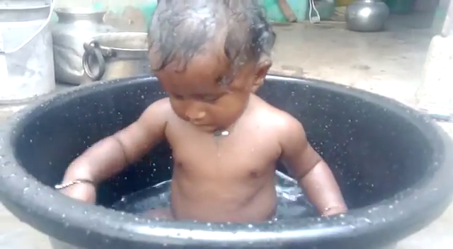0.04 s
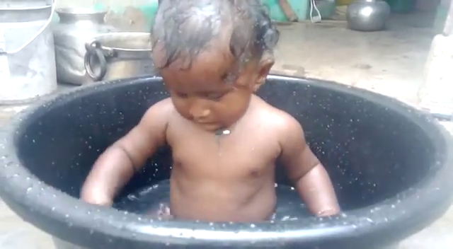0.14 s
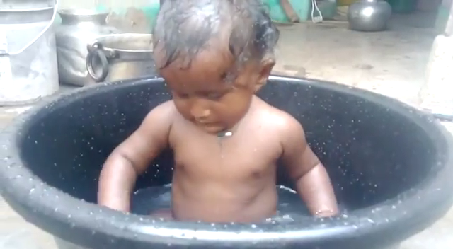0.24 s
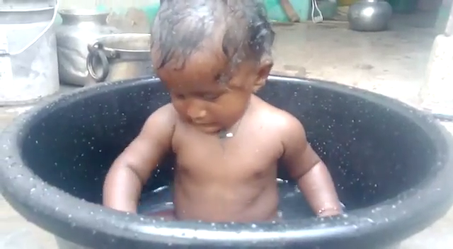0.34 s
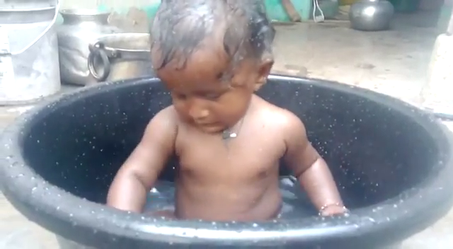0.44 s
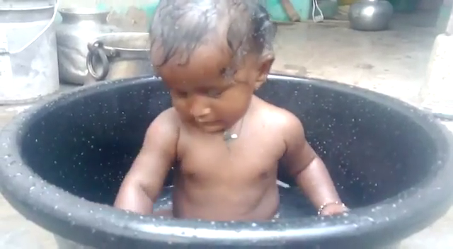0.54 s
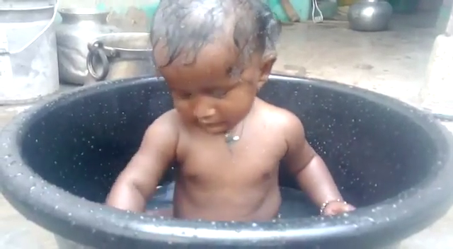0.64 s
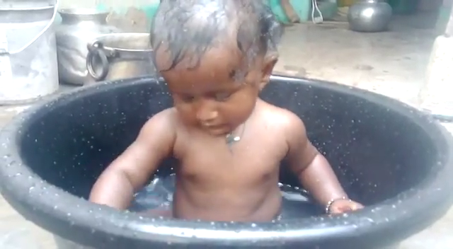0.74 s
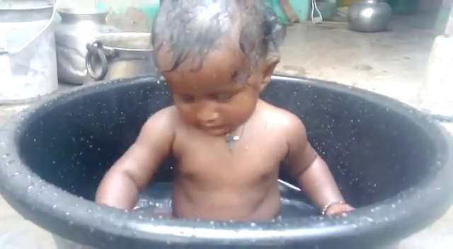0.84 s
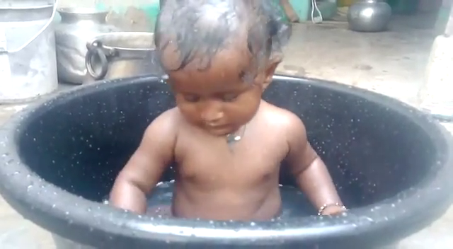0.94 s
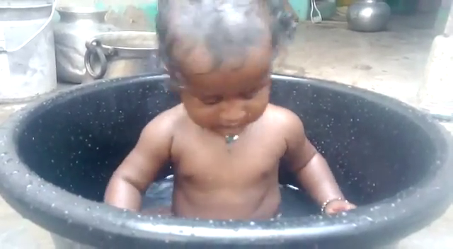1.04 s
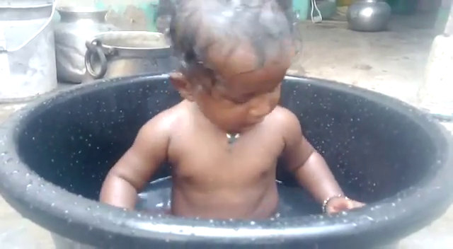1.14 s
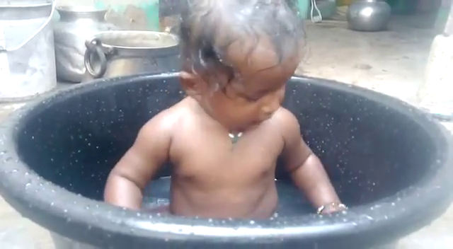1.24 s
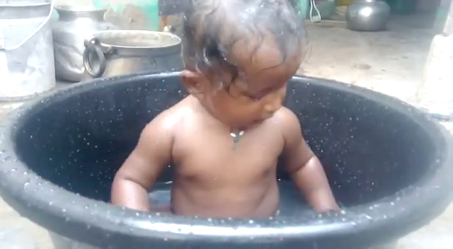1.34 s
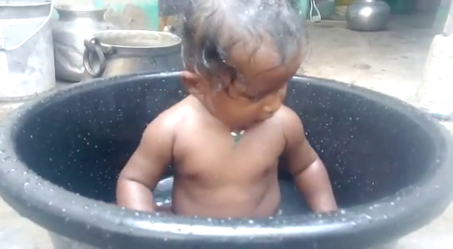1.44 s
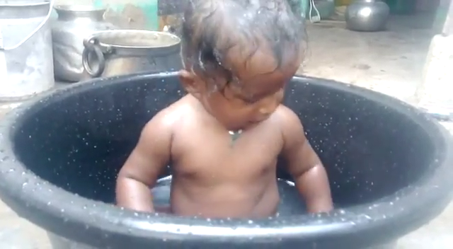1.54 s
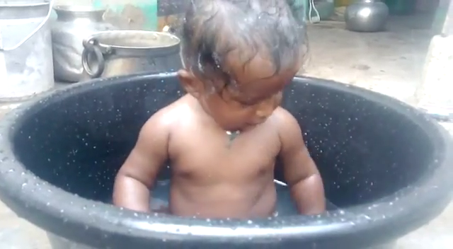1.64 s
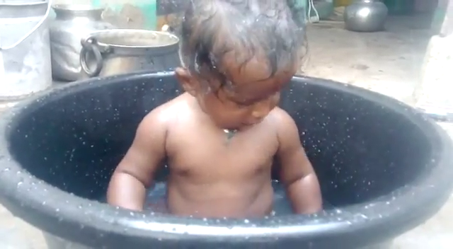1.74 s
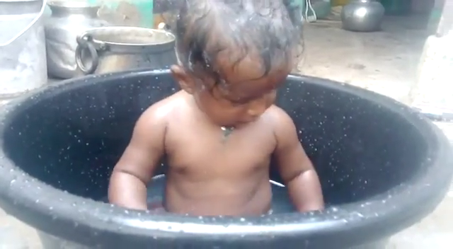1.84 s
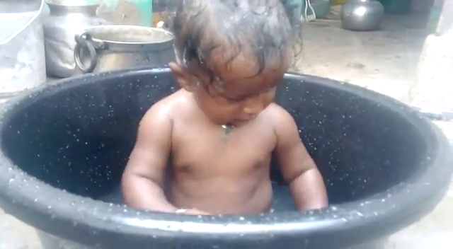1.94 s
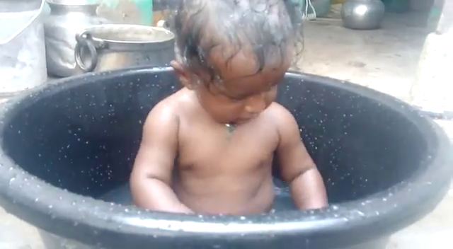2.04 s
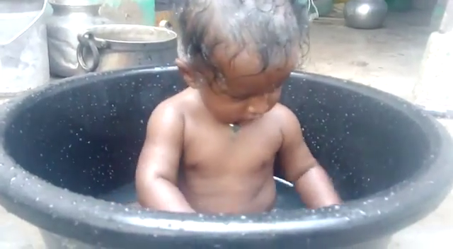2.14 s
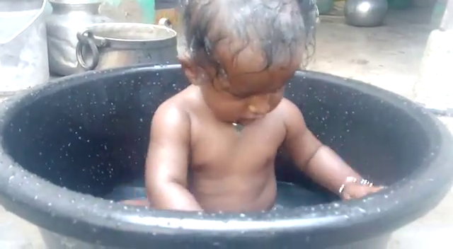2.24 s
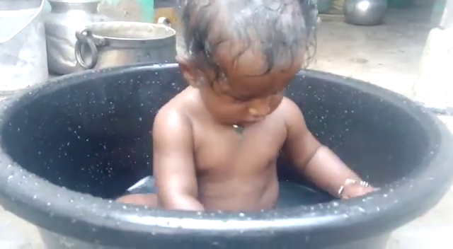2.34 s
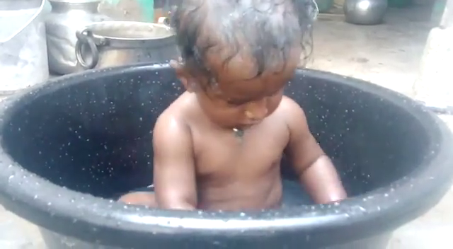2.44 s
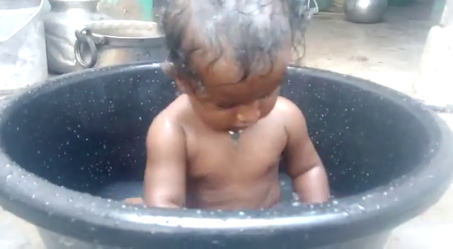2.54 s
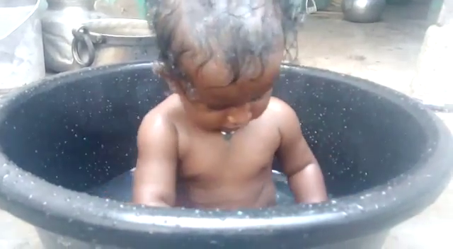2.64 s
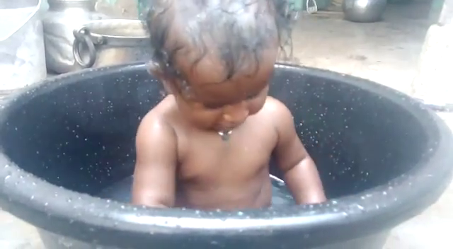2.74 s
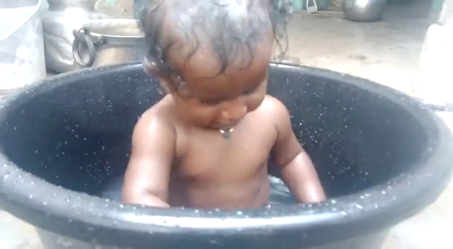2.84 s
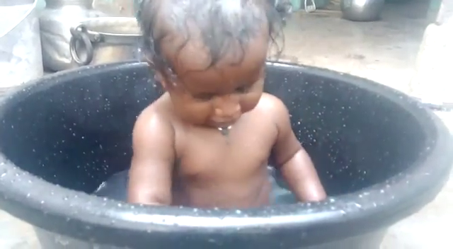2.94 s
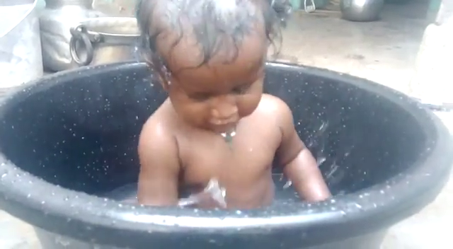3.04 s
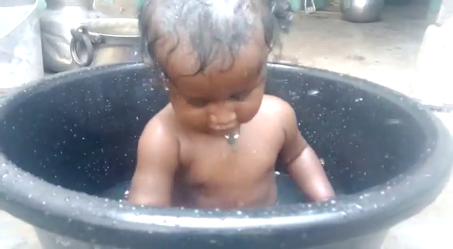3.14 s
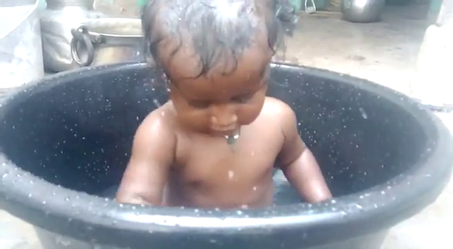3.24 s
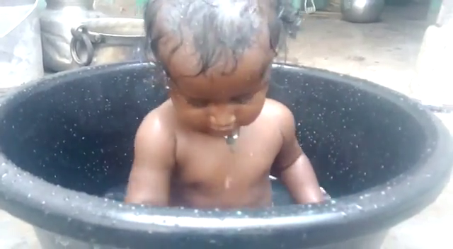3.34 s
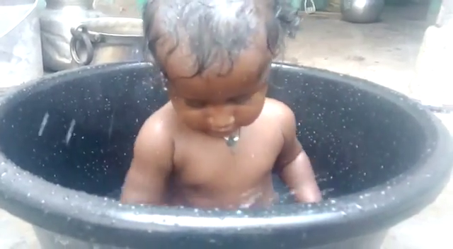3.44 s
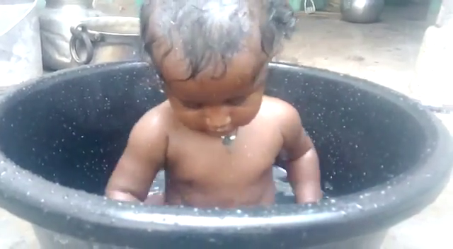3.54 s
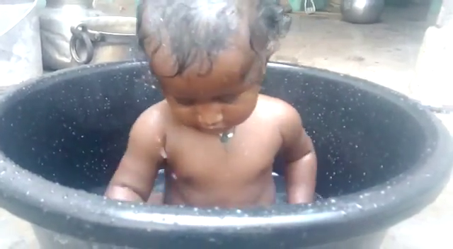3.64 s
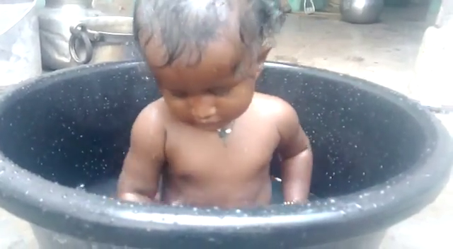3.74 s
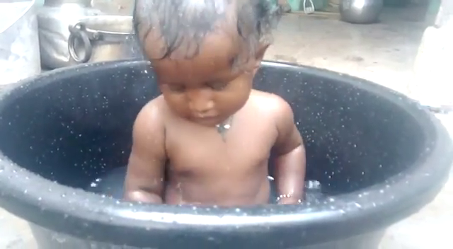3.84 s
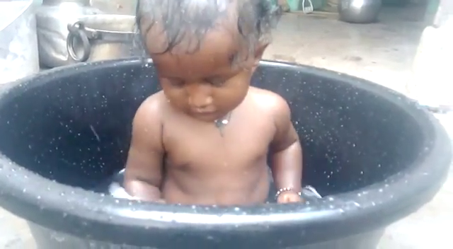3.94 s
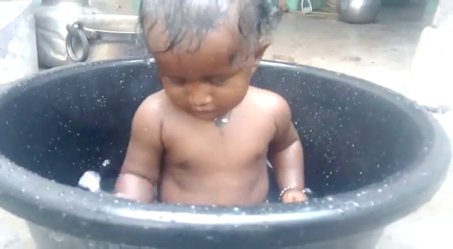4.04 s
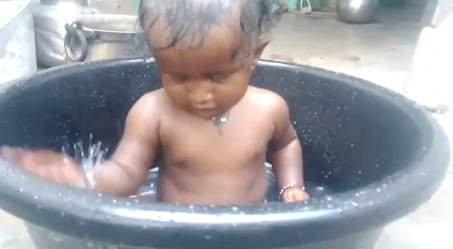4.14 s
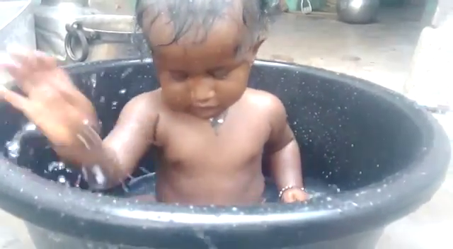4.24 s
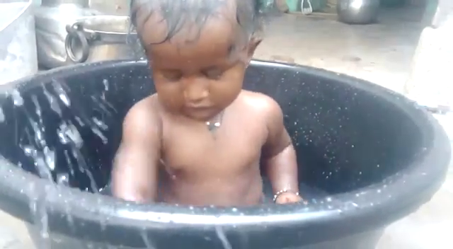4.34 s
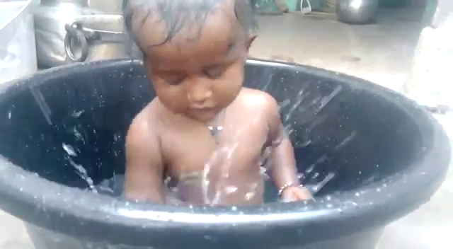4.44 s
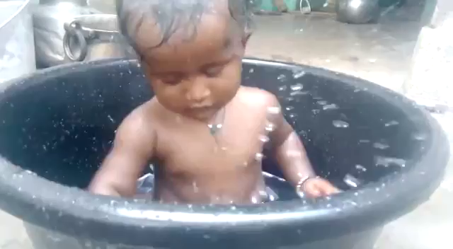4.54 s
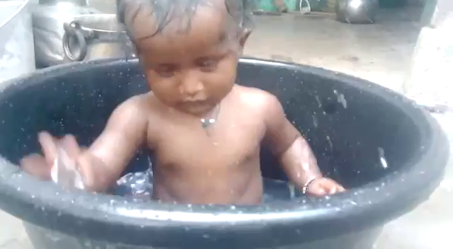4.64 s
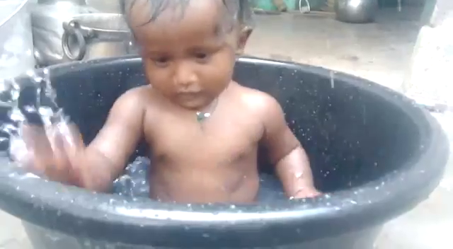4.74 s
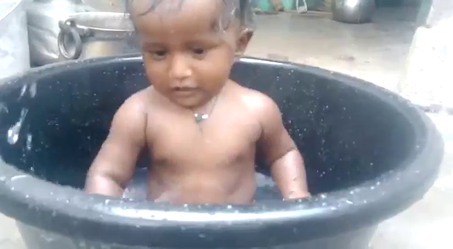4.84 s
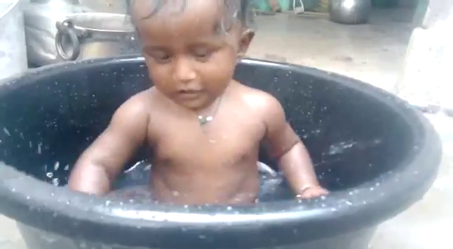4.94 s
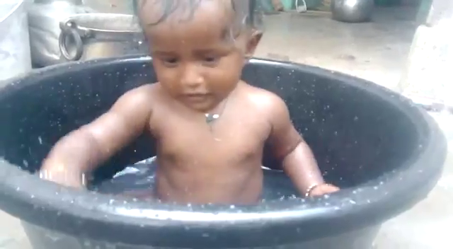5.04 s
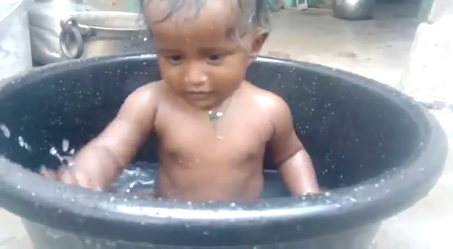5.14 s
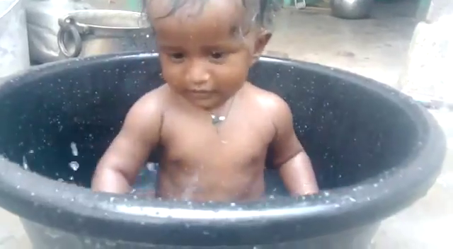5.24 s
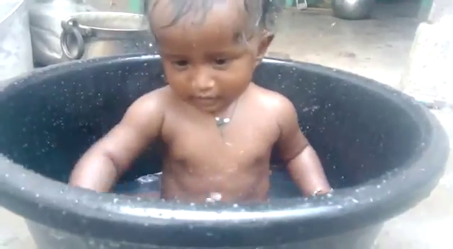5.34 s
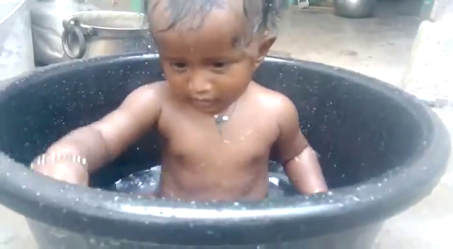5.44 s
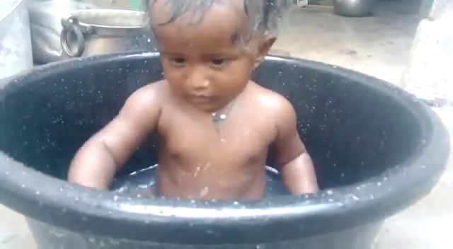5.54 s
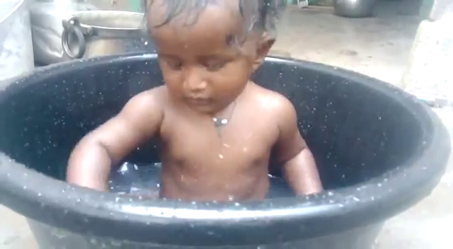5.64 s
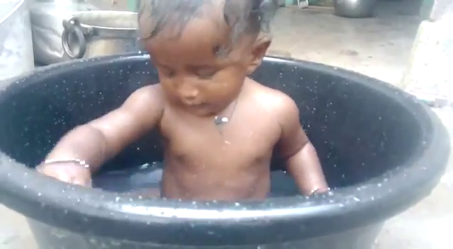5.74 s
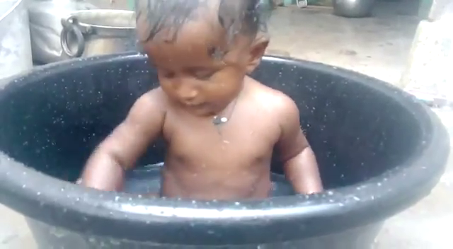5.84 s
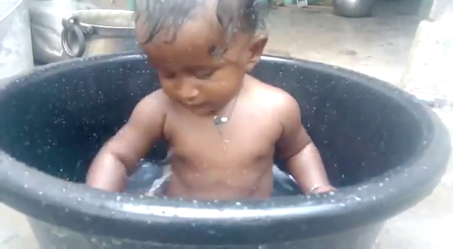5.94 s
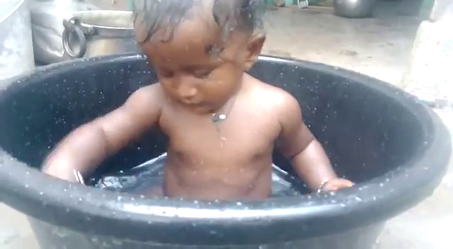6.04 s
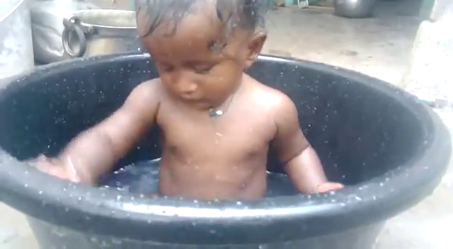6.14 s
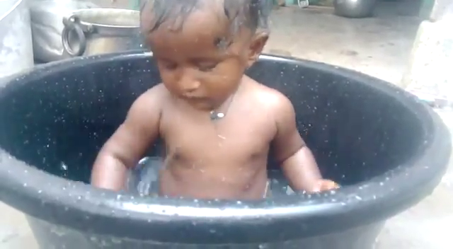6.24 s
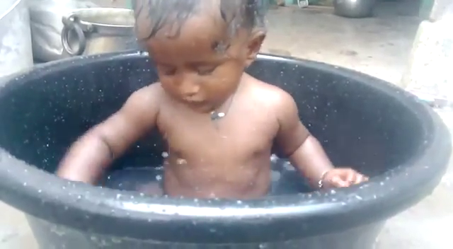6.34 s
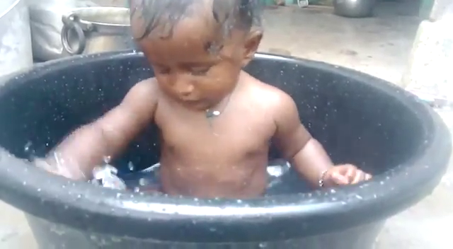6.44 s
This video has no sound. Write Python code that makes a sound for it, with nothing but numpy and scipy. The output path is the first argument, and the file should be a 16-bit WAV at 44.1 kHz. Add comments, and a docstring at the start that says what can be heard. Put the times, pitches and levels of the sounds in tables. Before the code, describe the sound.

A small hand pats and stirs shallow water in a plastic tub outdoors, light at first, then lively sharp slaps, plops and gurgling splashes.

```python
"""A wet slap cracks first; then a small hand slaps, pats and stirs shallow water in a plastic tub outdoors.
Slaps are shaped noise for spray, mist and a collapsing air pocket, plus a snap; deep plunges thump the tub.
Bubbles plop as fading tones that climb in pitch; stirred water fizzes, gurgles and sloshes in uneven grains.
Tub and paved-yard walls echo the water. Beneath lie a faint steady double tick, far rumble and air noise."""
import sys
import numpy as np
from scipy import signal
from scipy.fft import rfft, irfft
from scipy.io import wavfile
from scipy.ndimage import uniform_filter1d

SR = 44100
rng = np.random.default_rng(int(sys.argv[2]) if len(sys.argv) > 2 else 0)


def wav_out(sig):
    """Save sig, one row per channel (or a flat mono array), as 16-bit PCM at SR to the path in sys.argv[1]."""
    wavfile.write(sys.argv[1], SR, np.round(np.clip(np.atleast_2d(sig).T, -1, 1) * 32767).astype(np.int16))


N = 286209  # length in samples

# Fade times (t60) are the seconds a sound takes to drop by 60 dB.
# Slaps and drop hits; mist, pocket and snap levels are relative to the spray, and the fade time is
# limited, then shortened for mist and pocket:
# start_s, spray_db, spray_hz, mist_db, pocket_hz, pocket_db, fade_s, snap_db
SLAPS = [(0.0578, -28, 4250, -19, 2700, -7, 0.18, -7), (.0656, -27, 4380, -18, 2520, -28, 0.05, 15),
         (0.186, -41.5, 3870, -39, 2230, -27, .052, 5), (0.2072, -48.5, 4900, -34, 2117, -7, 0.082, 10),
         (0.266, -50, 4910, -41, 1190, -16, .18, 16.5), (0.313, -61, 4500, -37, 1160, -11, 0.19, 18),
         (0.409, -59, 5470, -7, 2560, -10, 0.2, 17.5), (0.7061, -38.5, 4260, -12.5, 2760, -24, 0.087, -12),
         (0.7111, -42, 4200, -51, 3050, -6.5, 0.18, 15.5), (.945, -56.5, 4570, -40, 1600, -1, 0.099, 0),
         (0.9734, -53, 4300, -38, 2340, 0, 0.051, 16), (0.9907, -52.5, 4490, -44, 2640, -9, 0.19, 9),
         (1.0228, -49.5, 4320, -50, 2570, -31, 0.12, 21.5),
         (1.1211, -33.5, 4730, -5.5, 2580, -38, 0.025, -7),
         (1.1279, -33.5, 5200, -16, 2600, -48, 0.16, -12), (1.133, -38, 4950, -33, 2640, -42, 0.024, 22.5),
         (1.495, -56, 4100, -9, 2610, -35, .088, -12), (1.508, -40, 4270, -21, 2450, -55, 0.079, 5),
         (2.5323, -32.5, 4050, -24, 2630, -13.5, 0.03, -15), (2.5451, -44.5, 4020, -30, 2740, -27, .21, -5),
         (2.648, -50.5, 5480, -20, 2290, -27, 0.23, 15), (2.6744, -34, 3940, -17.5, 1630, -6.5, 0.12, -5),
         (2.7782, -42, 4100, -47, 2520, 1, 0.069, 1), (2.8085, -43.5, 4200, -36, 877, -30, 0.072, -5),
         (2.8834, -47, 4600, -3, 2590, -8, 0.26, -4.5), (2.8935, -32.5, 4700, -29, 904, -7.5, 0.039, 7.5),
         (3.089, -47.5, 5240, -38, 960, 2.5, 0.023, 10), (3.1641, -34.5, 4200, -14, 775, -8, 0.36, -5.5),
         (3.1744, -23.5, 5700, -15, 980, 0, 0.081, -10), (3.2831, -39, 4000, -26, 2300, 7, 0.62, -14),
         (3.3147, -26.5, 3660, -25, 850, 6, .036, 10.5), (3.3278, -31, 3640, -29, 843, -11, 0.12, -0.5),
         (3.4015, -59, 4080, -21, 1490, 20, 0.09, 9), (3.442, -40.5, 4300, -25, 2330, 7, 0.41, -9),
         (3.4535, -35.5, 3630, -26, 880, 2, 0.2, 0.5), (3.5772, -33, 4220, -15, 2570, 6, 0.085, -5),
         (3.5847, -27, 4070, -17, 2190, -12, 0.048, 11.5), (3.5995, -34, 3520, -40, 2180, -36, 0.16, 13),
         (3.7141, -38, 3660, -17.5, 1610, -2.5, 0.13, -1.5), (3.7856, -57, 3860, -7, 1090, 11, 0.1, 7),
         (3.8636, -43.5, 4080, -15, 912, 2, 0.19, 1), (3.902, -42.5, 6730, -8, 1130, 13, 0.11, 9),
         (3.9201, -28.5, 3990, -27, 1650, -0.5, 0.19, -5.5), (3.9845, -34, 3760, -35, 1490, 10, 0.12, 0),
         (4.02, -36.5, 4430, -28, 750, 0.5, 0.35, 0), (4.0434, -28.5, 3900, -22, 1520, -13, 0.19, -13),
         (4.0637, -28.5, 3830, -24, 2390, -2, 0.068, -6.5), (4.1345, -45.5, 4560, -21, 1800, -8, 0.24, 5),
         (4.2514, -55, 3900, -33, 2190, 10.5, .087, 10), (4.3121, -38, 3900, -16.5, 1320, 4, 0.14, -4.5),
         (4.3256, -38, 5500, -33, 1420, -17, 0.18, -9), (4.3726, -37, 4830, -25, 1470, 4.5, 0.058, -9),
         (4.3996, -40.5, 5400, -15.5, 1200, -3, 0.076, -7),
         (4.5662, -18, 3690, -20.5, 2800, -5.5, 0.057, -5), (4.5776, -29, 6100, -17, 2270, -27, 0.13, -7),
         (4.6192, -37, 4000, -24, 950, 1.5, 0.21, -0.5), (4.6888, -39.5, 4730, -10, 1580, 8.5, 0.049, 0),
         (4.7494, -46, 4210, -10, 1370, 9.5, 0.28, -9), (4.781, -35.5, 4430, -37, 2400, -0.5, 0.16, 10),
         (4.8533, -29, 4480, -23, 870, -5.5, 0.04, 4), (4.8918, -36, 4200, -34, 930, 2, .088, -2.5),
         (4.9093, -36.5, 3500, -23, 2400, 4, .064, -10), (4.9898, -47, 5040, 2, 1890, 7, 0.1, 12),
         (5.0258, -15.5, 4760, -26, 2610, -14, 0.11, 6), (5.2308, -29, 6410, -10, 1580, -34, 0.029, 2.5),
         (5.2924, -36.5, 5230, -28, 1200, -1.5, 0.036, 3.5), (5.3187, -36, 3420, -35, 2700, 0, 0.044, 2.5),
         (5.3797, -56, 3540, -21, 2240, -6, .076, 18), (5.4164, -22, 4450, -22, 2470, -26, 0.084, -12),
         (5.4235, -29, 4710, -18, 2320, -1.5, 0.15, 17.5), (5.4848, -36, 4400, -26, 1690, 3, 0.24, -9.5),
         (5.6114, -39.5, 4020, -33, 2450, -4, .054, -4), (5.6464, -38.5, 4130, -35, 2320, -18, .16, 1),
         (5.6762, -39, 4640, -29, 2330, 0.5, 0.16, 19), (5.8102, -45.5, 4300, -23, 2160, -34, 0.33, -16),
         (5.8484, -37.5, 3170, -30, 1710, -3.5, 0.22, -2),
         (6.0566, -29, 4760, -14.5, 1770, -19, 0.057, -10.5),
         (6.0672, -30, 5700, -20, 1730, -10.5, 0.12, -8.5), (6.0828, -42, 5570, -15, 1780, -4.5, 0.051, 3),
         (6.1668, -30, 4440, -25, 1550, -9, 0.052, 1.5), (6.1831, -37, 4100, -28, 1710, -4.5, 0.11, 7),
         (6.263, -46, 4150, -40, 2240, 1.5, 0.09, 0), (6.4168, -19.5, 4460, -16, 2640, -30, 0.044, -16),
         (6.4214, -27.5, 4216, -17, 2680, -8, 0.12, 24), (6.4357, -30.5, 4650, -28, 1710, -4.5, 0.1, -2.5)]
# A flat slap snaps and rises at once, a glancing one swishes in: snap_db (relative to spray), rise_s
SLAP_RISE = [(-9.5, 0.0062), (-8.5, 0.00098), (2, 0.001306)]
# Tone colour of the spray: pitch_hz, relative_db (per Hz)
SPRAY_COLOUR = [(1760, -16), (3000, -6), (3490, -8), (4000, -5), (4460, -4.5), (5430, -4), (6270, -7),
                (7360, -15), (8500, -80), (11000, -70), (18700, -120)]
# Tone colour of the fine mist, before its tilt with slap strength: pitch_hz, relative_db (per Hz)
MIST_COLOUR = [(4240, -15), (7200, 4), (8310, -1.5), (9410, -5), (13600, -26), (15400, -26)]
# Harder slaps throw finer mist: tilt in dB per octave for each dB of spray above the pivot
MIST_TILT_PER_DB, MIST_PIVOT_DB = 0.25, -32
LUMP_DB, SPLASH_LOW_HZ = 2.5, 500  # unevenness of each splash's colour; low cut of all splashes

# Deeper plunges that thump the tub, with a rough peak level and a limited fade time:
# start_s, peak_db, fade_s
THUMPS = [(0.713, -51.5, 0.1), (0.749, -55.5, 0.078), (1.508, -66, 0.12), (2.679, -55, 0.15),
          (2.78, -39, 0.16), (2.811, -50, 0.14), (2.895, -48.5, 0.16), (3.038, -47.5, 0.11),
          (3.173, -28.5, 0.039), (3.178, -42, 0.033), (3.289, -38, 0.16), (3.316, -36, 0.066),
          (3.407, -43, 0.12), (3.457, -36, 0.075), (3.716, -51, 0.075), (3.868, -50, 0.27),
          (3.924, -43, 0.15), (3.987, -44.5, 0.12), (4.044, -43, 0.076), (4.067, -44, 0.1),
          (4.33, -39.5, 0.087), (4.375, -52, 0.1), (4.529, -31, 0.065), (4.57, -23.5, 0.036),
          (4.621, -39, 0.075), (4.66, -35.5, 0.11), (4.692, -47, 0.068), (4.754, -47, 0.11),
          (4.785, -60, 0.1), (4.859, -41.5, 0.075), (4.897, -39, 0.086), (5.027, -37.5, 0.13),
          (5.179, -48, 0.1), (5.428, -45, 0.1), (5.458, -43, 0.1), (5.488, -45.5, 0.16), (5.54, -48, 0.1),
          (6.086, -50, 0.085), (6.131, -55, 0.075), (6.186, -61, 0.092), (6.218, -47, 0.037)]
THUMP_RISE_S, THUMP_CREST_DB = 0.0085, 9  # crest = peak over average (rms) level

# Single bubbles, peak level before wavering; the pitch rises by about 0.36 of climb_octaves after its start:
# start_s, peak_db, pitch_hz, climb_octaves
BUBBLES = [(.001, -48.5, 1210, .3), (.099, -46, 885, 0.53), (.18, -40, 2210, 0.21), (.206, -45, 1990, 0.39),
           (.2463, -48, 4950, .1), (.26, -61, 1130, .05), (.5796, -42, 4180, .1), (.581, -53, 1840, 0.68),
           (.638, -31.5, 1475, 0.55), (.66, -45, 1810, 0.15), (.715, -52, 880, .1), (.73, -57, 477, 0.33),
           (.75, -56, 900, .2), (.892, -47, 1685, 0.62), (.964, -46, 2210, 1), (1.239, -46.5, 1820, 1.2),
           (1.29, -57, 1900, .2), (1.5, -64, 794, .1), (2.583, -44.5, 1604, 0.91), (2.684, -44, 438, 0.18),
           (2.762, -36, 843, .58), (2.817, -44.5, 887, 0.24), (2.847, -46, 2470, .33),
           (2.9407, -37.5, 3250, .1), (3.001, -44, 1450, 0.16), (3.022, -32, 1176, 0.42),
           (3.1343, -40, 3960, .1), (3.143, -36.5, 2360, .25), (3.245, -36.5, 980, .13),
           (3.399, -37.5, 634, 0.28), (3.421, -29.5, 920, 0.34), (3.489, -36.5, 598, 0.18),
           (3.577, -18.5, 2260, 0.11), (3.635, -32, 1603, 0.29), (3.646, -31.5, 2220, 0.86),
           (3.671, -31, 997, .2), (3.671, -34, 2560, .3), (3.676, -28.5, 668, 0.4), (3.69, -38, 1550, .1),
           (3.7135, -30.5, 3920, .1), (3.903, -42, 1300, .23), (3.914, -24, 894, .1),
           (3.974, -24, 2270, 0.13), (3.987, -17, 1524, 0.17), (4.043, -28.5, 1514, .34),
           (4.252, -39, 2196, 0.4), (4.291, -39, 1003, 1), (4.355, -38, 862, 1.4),
           (4.4144, -30.5, 5370, 0.092), (4.421, -37, 1160, 2), (4.4393, -29.5, 4170, 0.18),
           (4.53, -35, 423, 0.22), (4.574, -32, 522, 0.15), (4.624, -31.5, 822, 0.26),
           (4.656, -27, 927, 0.58), (4.69, -38, 1520, 0.34), (4.699, -34, 1053, .1),
           (4.762, -27.5, 2225, 0.91), (4.794, -31.5, 1097, 0.2), (4.856, -37.5, 860, .1),
           (4.895, -32, 950, .2), (4.983, -43, 704, .3), (5.039, -28, 1530, 0.32), (5.045, -38.5, 431, .2),
           (5.1133, -27, 4500, .1), (5.119, -31.5, 2540, 0.48), (5.1794, -31.5, 4140, 0.087),
           (5.202, -32.5, 1545, 0.65), (5.2066, -25.5, 4750, 0.12), (5.235, -29, 1553, 2),
           (5.377, -29.5, 2250, 0.33), (5.491, -31, 835, 3.3), (5.541, -27, 1694, 0.31),
           (5.646, -35, 2200, 1.3), (5.6765, -31, 4660, .2), (5.695, -49, 874, 1.6),
           (5.856, -30, 1495, 0.11), (6.068, -42.5, 717, 0.22), (6.1, -46, 628, 0.18),
           (6.134, -40, 858, 0.26), (6.15, -45, 505, 0.37), (6.173, -33.5, 1774, .41),
           (6.267, -33.5, 2280, 0.41), (6.306, -32, 1826, 2), (6.424, -39.5, 877, 0.26)]
# Times for a 1 kHz bubble; higher ones start and fade faster
BUBBLE_RISE_S, BUBBLE_T60_S, FADE_OCT_PER_OCT = 0.0038, 0.03, 0.57
CLIMB_T60_S = 0.0253  # extra fade time for each unit of climb

# How strongly the hand stirs the water: time_s, fizz_db, gurgle_db, slosh_db
STIR = [(0.0, -62, -67.5, -76), (0.09, -52.5, -64.5, -72), (0.29, -63, -67.5, -74.5),
        (0.4, -69.5, -76.5, -76.5), (0.69, -64.5, -66.5, -75), (0.81, -62.5, -72.5, -73.5),
        (0.96, -65, -72, -76.5), (1.14, -61.5, -71, -75.5), (1.32, -69, -73.5, -75.5),
        (1.52, -62, -75.5, -75), (1.97, -73.5, -75.5, -75.5), (2.4, -68, -73, -74),
        (2.58, -60.5, -71, -75.5), (2.73, -53, -60, -60), (2.86, -59, -69, -71), (3.02, -50.5, -56, -66),
        (3.14, -55, -61.5, -67), (3.29, -46, -43.5, -51.5), (3.36, -47, -48.5, -53),
        (3.52, -46.5, -54.5, -66), (3.7, -53.5, -51.5, -61), (3.89, -52.5, -61, -69.5),
        (4.05, -71, -64, -65), (4.27, -54, -57, -70.5), (4.37, -42.5, -45.5, -61), (4.48, -56, -56, -66.5),
        (4.64, -50.5, -57, -48), (4.75, -45.5, -49, -55.5), (4.9, -38.5, -39.5, -49.5),
        (5.01, -45.5, -50, -50.5), (5.2, -44, -51.5, -68.5), (5.39, -50.5, -59, -66.5),
        (5.55, -45.5, -41.5, -61), (5.67, -53.5, -69, -70), (5.84, -61, -67.5, -75),
        (5.95, -62, -71, -73.5), (6.11, -53.5, -64, -63), (6.24, -52.5, -61, -58), (6.33, -50, -73, -68),
        (6.49, -64, -49, -79)]
FINE_SHARE, FINE_SWING, FINE_WANDER_S = 0.27, 0.15, 0.033  # share of small drops in the fizz, and its wander

ECHO_T60_S, ECHO_RISE_S, ECHO_DB = 0.16, 0.008, -11  # the fade time is for the low part

# Clicks in each round, level before random scatter: offset_s, peak_db
TICKS = [(.0094, -54), (.0171, -59)]
TICK_HZ = 29.468  # rounds per second

# Swelling of the far rumble: time_s, deep_part_db, upper_part_db
RUMBLE = [(0.0, -78, -83), (0.12, -77, -71.5), (0.54, -85, -83.5), (1.3, -58.5, -68.5), (1.37, -79, -70),
          (2.31, -71, -74), (2.58, -64.5, -71.5), (3.03, -71.5, -65), (4.54, -77.5, -71.5),
          (4.57, -59, -53), (4.64, -67, -65), (5.67, -75, -70), (6.24, -61.5, -62.5), (6.49, -80, -68.5)]
# Resonances of the deep part, then of the upper part: pitch_hz, width_hz, relative_db
RUMBLE_MODES = [
    [(47.7, 23, -14), (87.5, 21, 3)],
    [(125.4, 35, 0), (170.7, 17, -9)],
]
# Tone colour of the air noise: pitch_hz, relative_db (per Hz)
AIR_COLOUR = [(15, -53), (25, -2), (96, 2.5), (152, -1.5), (227, 6), (297, -2.5), (469, -3.5), (567, -18),
              (1110, -23), (1270, -32), (3260, -24), (5730, -9), (7700, -24.5), (15500, -26)]
AIR_DB = -75.5

TOP_HZ = 15650  # the phone passes sound up to here


def undb(db):
    """Turn decibels into a gain."""
    return 10 ** (np.asarray(db) / 20)


def unit(x):
    """Scale to an average (rms) level of 1 along time."""
    return x / np.sqrt(np.mean(x ** 2, axis=-1, keepdims=True))


def shaped(x, gain):
    """Filter each row by a gain given as a function of Hz, then scale it to rms 1."""
    size = x.shape[-1]
    hz = np.arange(1, size // 2 + 2) * SR / size
    return unit(irfft(rfft(x) * gain(hz), size))


def colour(points):
    """Gain that joins (Hz, dB) points, with pitch on a log scale."""
    hz, db = np.transpose(points)
    return lambda f: undb(np.interp(np.log(f), np.log(hz), db))


def hump(hz, width_hz):
    """Gain of one resonance: strongest at hz and weaker to both sides."""
    return lambda f: 1 / np.sqrt(1 + ((f - hz ** 2 / f) / width_hz) ** 2)


def curve(rows):
    """Draw straight lines through the columns of (s, value, ..) rows, one value per sample."""
    s, *columns = np.transpose(rows)
    return [np.interp(np.arange(N) / SR, s, c) for c in columns]


def place(times, rows):
    """Lay one sound at each time."""
    out = np.zeros(N + rows.shape[1])
    for s, row in zip(times, rows):
        first = int(s * SR)
        out[first:first + len(row)] += row
    return out[:N]


def swell(t, rise, t60):
    """Rise smoothly to 1, then die away by 60 dB in t60 seconds."""
    attack = np.sin(np.pi / 2 * np.clip(t / rise, 0, 1)) ** 2
    return attack * np.exp(-np.log(1000) * np.maximum(t - rise, 0) / t60)


def crackle(shape, spread_db, size):
    """Noise broken into grains of size samples, each with its own random loudness."""
    grains = rng.exponential(size=shape[:-1] + (shape[-1] // size + 1,))
    grains = np.minimum(grains, 4.2)  # no grain stands out too far
    loudness = np.repeat(undb(spread_db * grains), size, axis=-1)[..., :shape[-1]]
    return rng.standard_normal(shape) * loudness


def ring(t, hz, rise, t60, climb):
    """A bubble: a sine whose pitch climbs as it nears the surface, then levels off."""
    progress = np.maximum((t - rise) / t60, -.06)
    pitch = hz * 2 ** (climb * .36 * np.tanh(progress / .4))
    return swell(t, rise, t60) * np.sin(2 * np.pi * np.cumsum(pitch, axis=-1) / SR)


def slaps():
    """The water skin breaks into spray and mist; the air pocket trapped below collapses a little later."""
    s, spray_db, spray_hz, mist_db, pocket_hz, pocket_db, t60, snap_db = np.transpose(SLAPS)[:, :, None]
    t = np.arange(8192) / SR
    rise = np.interp(snap_db, *np.transpose(SLAP_RISE))
    t60 = np.clip(t60, .008, .5)
    burst = crackle((len(s), 2, len(t)), 1.64, size=32)
    # every splash throws drops of its own sizes, so some pitches stand out
    bumps = uniform_filter1d(rng.standard_normal((len(s), len(t) // 2 + 1)), size=50)
    lumps = undb(LUMP_DB * unit(bumps))

    def spray_gain(f):
        return colour(SPRAY_COLOUR)(f) * lumps * (0.13 + hump(spray_hz, 900)(f))

    def mist_gain(f):
        tilt = MIST_TILT_PER_DB * (spray_db - MIST_PIVOT_DB)
        return colour(MIST_COLOUR)(f) * undb(tilt * np.log2(f / 8000))

    def pocket_gain(f):
        return lumps * hump(pocket_hz, .35 * pocket_hz)(f) * hump(1500, 2600)(f) ** 4

    # the water skin breaks with one brief snap just after the rise
    snap_shape = np.exp(-((t - rise - .001) / 0.0007) ** 2)
    snap = undb(snap_db) * snap_shape * np.cos(2 * np.pi * spray_hz * t)
    spray = shaped(burst[:, 0], spray_gain) * swell(t, rise, t60) + snap
    mist = shaped(crackle((len(s), len(t)), 3.46, size=48), mist_gain)
    mist = mist * swell(t, rise + 0.0004, 0.77 * t60)
    pocket = shaped(burst[:, 1], pocket_gain) * swell(t, rise + 0.0023, 0.59 * t60)
    splash = undb(spray_db) * (spray + undb(mist_db) * mist + undb(pocket_db) * pocket)
    # the listed moment lies part way up the rise
    splashes = place((s - 0.64 * rise)[:, 0], splash)
    return signal.sosfilt(signal.butter(2, SPLASH_LOW_HZ, "high", fs=SR, output="sos"), splashes)


def thumps():
    """A low burst as the hand drives down into the water and shakes the tub."""
    s, peak_db, t60 = np.transpose(THUMPS)[:, :, None]
    t = np.arange(8192) / SR
    thump = shaped(crackle((len(s), len(t)), 2.67, size=32), lambda f: hump(380, 520)(f) ** 4)
    thump = thump * swell(t, THUMP_RISE_S, np.clip(t60, .01, .5))
    return place(s[:, 0], undb(peak_db - THUMP_CREST_DB) * thump)


def bubbles():
    """Clear single plops: small bubbles ring higher and shorter, and those that climb far ring longer."""
    s, peak_db, hz, climb = np.transpose(BUBBLES)[:, :, None]
    t = np.arange(4096) / SR
    slow = (1000 / hz) ** FADE_OCT_PER_OCT
    t60 = BUBBLE_T60_S * slow + CLIMB_T60_S * climb
    # churning water shakes each bubble, so its ring wavers
    shake = uniform_filter1d(rng.standard_normal((len(s), len(t))), size=120)
    waver = undb(1.1 * unit(shake))
    return place(s[:, 0], waver * undb(peak_db) * ring(t, hz, BUBBLE_RISE_S * slow, t60, climb))


def swarm(count, low_hz, high_hz, cycles, spread_db, climb):
    """Many small bubbles of random pitch, loudness, length and time; rms 1."""
    when, pitch, size, length = rng.random((count, 4)).T[:, :, None]
    hz = low_hz * (high_hz / low_hz) ** pitch
    t = np.arange(1536) / SR
    rows = ring(t, hz, 1.31 / hz, cycles * (0.75 + length) / hz, climb * length)
    rows = rows * np.cos(np.pi / 2 * t / t[-1])  # fade fully by the end
    rows = rows * undb(-spread_db * np.log(size + .06))
    return unit(place(when[:, 0] * N / SR, rows))


def brisk(db):
    """Share of bubbles, 0 to 1: nearly still water traps no air."""
    return np.clip((db + 78) / 15, 0, 1)


def fizz(level_db):
    """Tiny drops hiss: larger ones fizz lower, and the mix of sizes wanders."""
    drops = crackle((2, N), 3.88, size=260)
    wander = shaped(rng.standard_normal(N), lambda f: 1 / (1 + (f * FINE_WANDER_S) ** 2))
    small = np.clip(FINE_SHARE + FINE_SWING * wander, 0, 1)
    spray_colour = colour(SPRAY_COLOUR)
    large_drops = shaped(drops[0], lambda f: spray_colour(f) * hump(4300, 2000)(f) ** 2)
    small_drops = shaped(drops[1], lambda f: spray_colour(f) * hump(5600, 2200)(f) ** 2)
    out = np.sqrt(1 - small) * large_drops + np.sqrt(small) * small_drops
    # flung drops tick brightly when the stirring is brisk
    flung = shaped(crackle((N,), 5.1, size=400), colour(MIST_COLOUR))
    out += undb(-19.5 + 0.26 * (level_db + 26.0)) * flung
    tiny_bubbles = swarm(count=1000, low_hz=2944, high_hz=6270, cycles=55, spread_db=-1, climb=0.71)
    out += 0.43 * brisk(level_db) * tiny_bubbles
    return undb(level_db) * unit(out)


def gurgle(level_db):
    """Small bubbles ring in a swarm over mid-pitched churning noise."""
    churn = shaped(crackle((N,), 2.86, size=300), lambda f: hump(1900, 2200)(f) ** 4)
    small_bubbles = swarm(count=1300, low_hz=1229, high_hz=2740, cycles=46.6, spread_db=5.0, climb=1.0)
    return undb(level_db) * unit(.5 * churn + brisk(level_db) * small_bubbles)


def slosh(level_db):
    """Larger air pockets ring low over low churning noise."""
    churn = shaped(crackle((N,), 2.25, size=500), lambda f: hump(700, 1000)(f) ** 4)
    pockets = swarm(count=1300, low_hz=407, high_hz=1125, cycles=15, spread_db=5, climb=0.32)
    return undb(level_db) * unit(.5 * churn + brisk(level_db) * pockets)


def stirring():
    """The moving hand makes fizz, gurgle and slosh, each with its own changing level."""
    fizz_db, gurgle_db, slosh_db = curve(STIR)
    return fizz(fizz_db) + gurgle(gurgle_db) + slosh(slosh_db)


def echoes(x):
    """Tub and yard walls: scattered reflections whose low and high parts die away each at its own pace."""
    def low_gain(f):
        return 1 / (1 + (f / 3000) ** 4)

    t = np.arange(16384) / SR
    low, high = crackle((2, len(t)), 5.5, size=8)
    tail = shaped(low, low_gain) * swell(t, ECHO_RISE_S, ECHO_T60_S)
    tail += shaped(high, lambda f: 1 - low_gain(f)) * swell(t, ECHO_RISE_S, 1.3 * ECHO_T60_S)
    tail = tail / np.sqrt(np.sum(tail ** 2))
    return signal.fftconvolve(x, tail)[:N] * undb(ECHO_DB)


def ticking():
    """A faint pair of clicks, each a very short 5300 Hz tone, repeating at a steady rate."""
    t = np.arange(-64, 64) / SR
    click = np.exp(-(t / .00025) ** 2) * np.cos(2 * np.pi * 5300 * t)
    rounds = np.arange(int(N / SR * TICK_HZ)) / TICK_HZ
    scatter = undb(0.82 * rng.standard_normal((len(rounds), len(TICKS))))  # uneven loudness
    out = np.zeros(N)
    for k, (s, peak_db) in enumerate(TICKS):
        out += place(rounds + s + t[0], undb(peak_db) * scatter[:, [k]] * click)
    return out


def rumble():
    """Far rumble: noise through low resonances, in two parts that swell apart."""
    out = np.zeros(N)
    for level_db, modes in zip(curve(RUMBLE), RUMBLE_MODES):
        def gain(f):
            return sum(undb(db) * hump(hz, width)(f) ** 2 for hz, width, db in modes)
        out += undb(level_db) * shaped(rng.standard_normal(N), gain)
    return out


def air():
    """Steady, faint air noise with a fixed tone colour."""
    return undb(AIR_DB) * shaped(rng.standard_normal(N), colour(AIR_COLOUR))


def scene():
    """Water with its echoes over the ticking, rumble and air."""
    water = slaps() + thumps() + bubbles() + stirring()
    return (water + echoes(water) + ticking() + rumble() + air())[None]


def record(dry):
    """The phone cuts the top: a steep filter removes the highest pitches."""
    return signal.sosfilt(signal.ellip(10, .2, 60, TOP_HZ, fs=SR, output="sos"), dry)


dry = scene()
out = record(dry)
wav_out(out)
```